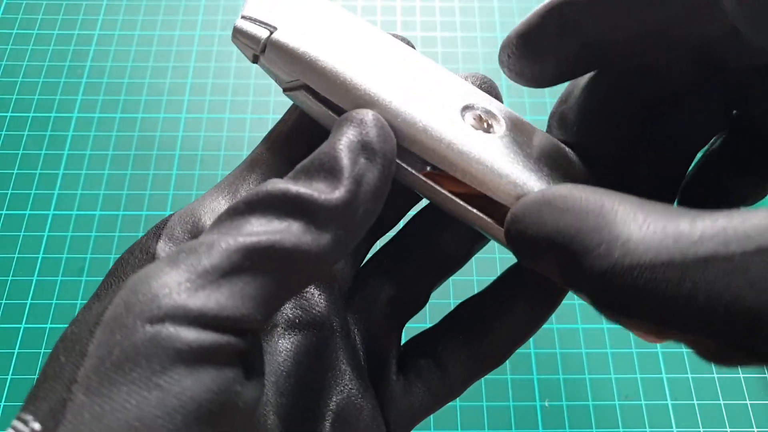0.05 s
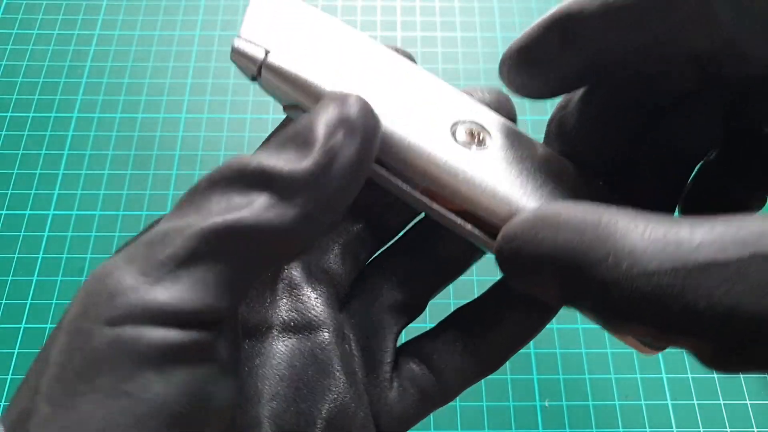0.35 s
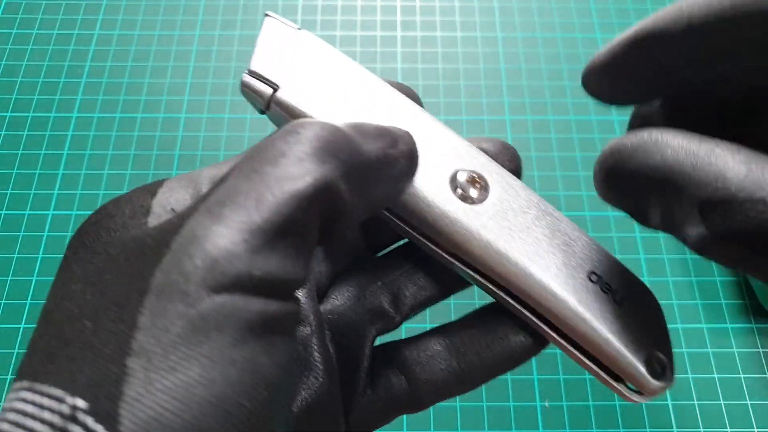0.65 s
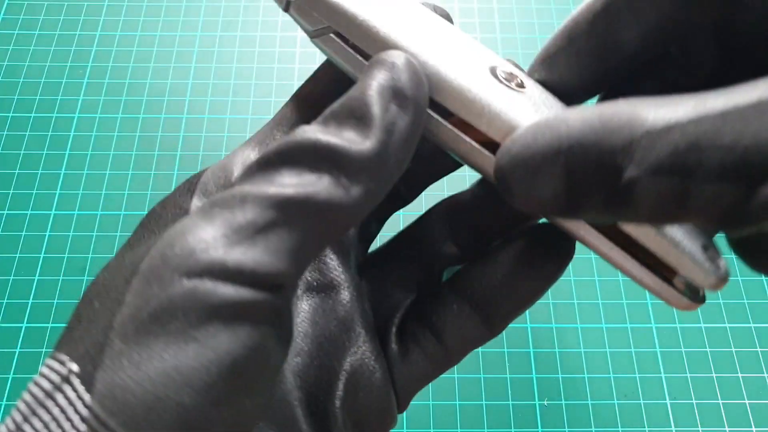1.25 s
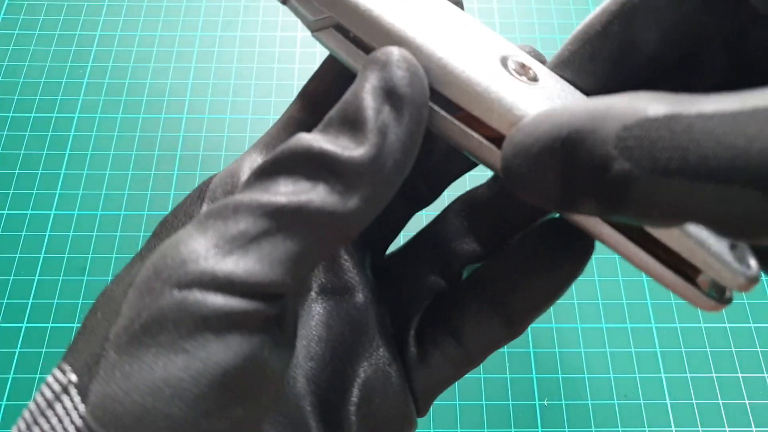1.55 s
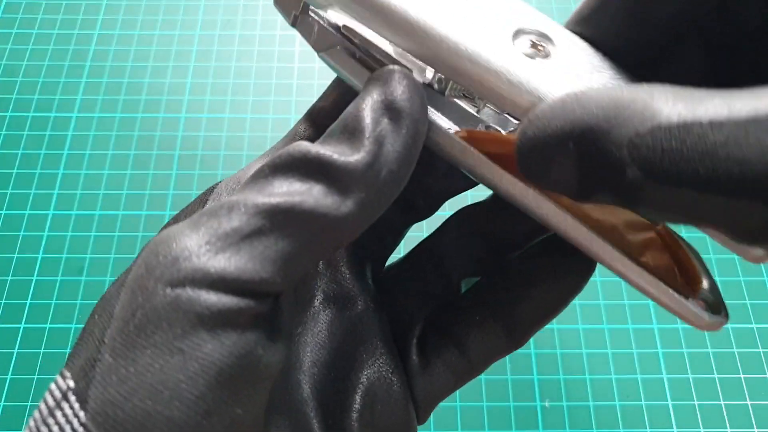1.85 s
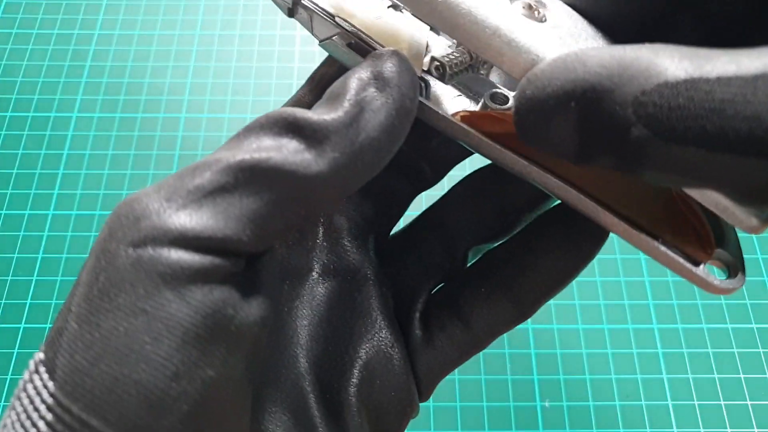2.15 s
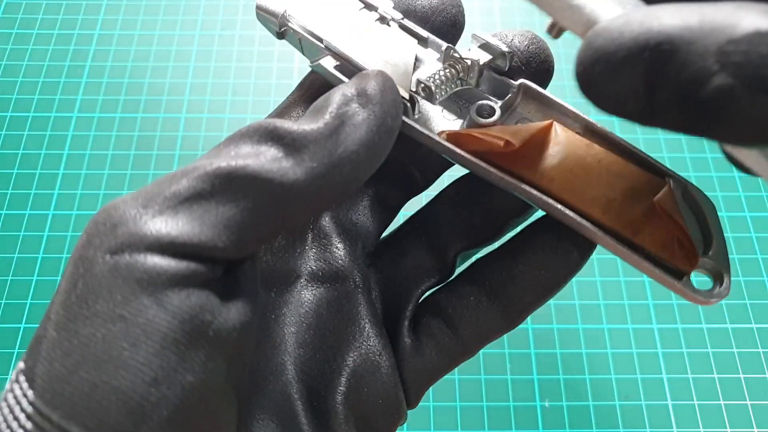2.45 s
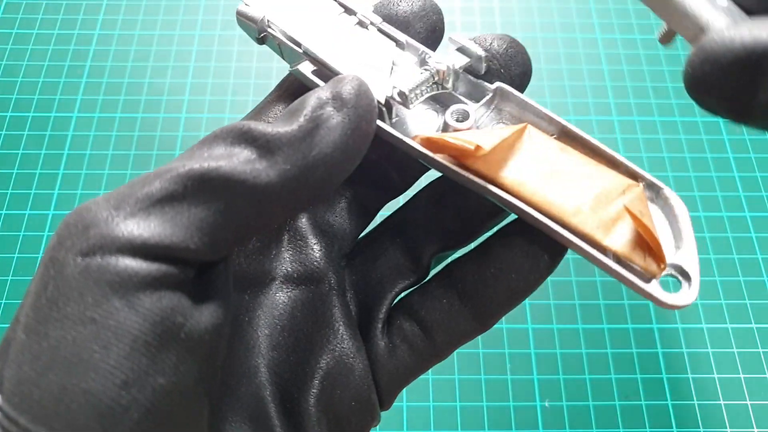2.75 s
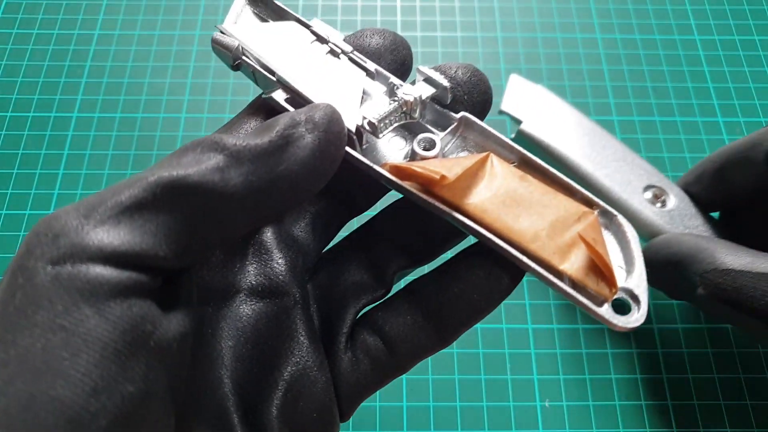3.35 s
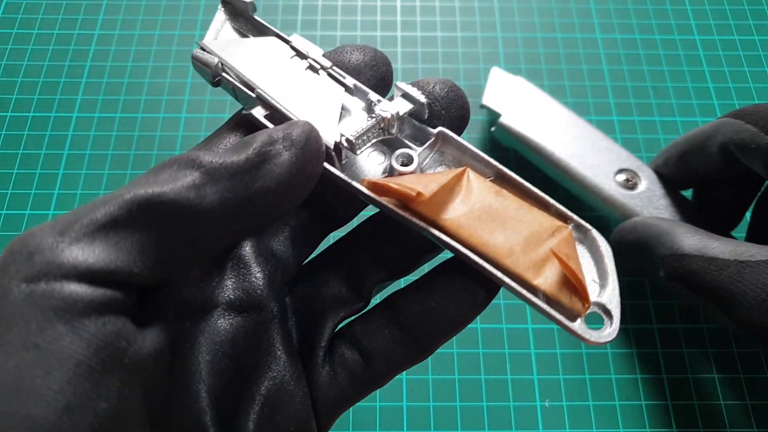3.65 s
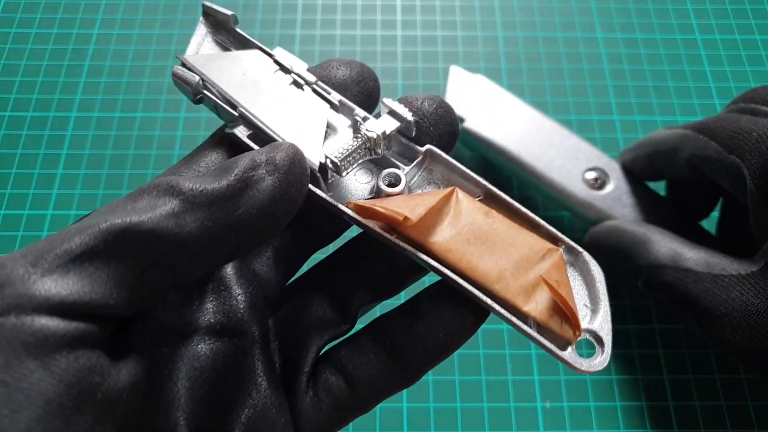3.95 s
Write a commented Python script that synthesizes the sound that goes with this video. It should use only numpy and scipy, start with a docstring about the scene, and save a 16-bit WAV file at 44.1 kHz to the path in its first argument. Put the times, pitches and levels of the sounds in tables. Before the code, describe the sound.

A metal utility knife clicks and snaps sharply twice as gloved hands work it open. The halves rattle and scrape apart, then one lands on a mat with a dull clack, close up in a small room.

```python
"""Opening a utility knife

Gloved hands work the two cast-metal halves of a knife apart, close up in a small room. The halves
snap together twice, rattle and scrape as they part, and one is set down on a cutting mat.
The grip damps the metal, so the room carries the tails. A far engine drone and soft hiss lie below."""
import sys
import numpy as np
from scipy import signal
from scipy.fft import rfft, irfft
from scipy.io import wavfile

SR = 44100
rng = np.random.default_rng(int(sys.argv[2]) if len(sys.argv) > 2 else 0)


def unload_wav(signal):
    """Save mono or channel-first audio to the path in sys.argv[1] as 16-bit WAV at rate SR, clipped to [-1, 1]."""
    wavfile.write(
        sys.argv[1],
        SR,
        np.round(np.clip(np.atleast_2d(signal).T, -1, 1) * 32767).astype(np.int16),
    )


N = 176400
T = np.arange(N) / SR


def from_db(db):
    """Decibels to gain."""
    return 10 ** (np.asarray(db) / 20)


def rms_one(x):
    """Scale to unit rms."""
    return x / np.sqrt(np.mean(x ** 2) + 1e-20)


def pan(db):
    """Stereo gains that put the left side db above the right."""
    return from_db(np.array([[.5], [-.5]]) * db)


def level(rows):
    """A fader ride through rows of seconds and dB."""
    return from_db(np.interp(T, *np.transpose(rows)))


def decay(t, t60):
    """A tail that falls 60 dB in t60 seconds."""
    return np.exp(-np.log(1000) * t / t60)


def at_hz(points, hz):
    """Read a table on a log-frequency axis."""
    freqs, values = np.transpose(points)
    return np.interp(np.log(np.maximum(hz, 1)), np.log(freqs), values)


def add(out, start_s, x):
    """Mix x in at its start time."""
    i = max(int(start_s * SR), 0)
    out[:, i:i + x.shape[1]] += x[:, :N - i]


def brighten(hz, tilt):
    """Harder contacts favour the highs: a tilt in dB per octave about 4 kHz, flat below 1.5 kHz."""
    return from_db(tilt * np.log2(np.maximum(hz, 1500) / 4000))


def noise(spectrum, size, correlation=None, tilt=0):
    """Coloured stereo noise, at unit rms before the tilt."""
    hz = np.fft.rfftfreq(size, 1 / SR)
    mid, side = rfft(rng.standard_normal((2, size)))
    alike = np.clip(at_hz(correlation, hz), 0, .995) if correlation else 0
    stereo = np.sqrt(1 + alike) * mid + np.sqrt(1 - alike) * side * [[1], [-1]]
    colour = rms_one(from_db(at_hz(spectrum, hz)))
    return irfft(stereo * colour * brighten(hz, tilt), size) / np.sqrt(2)


# Stereo image of rumble, rub and hiss. Each row: frequency in Hz, left-right correlation.
BED_CORRELATION = [(60, 0.79), (150, 0.98), (300, 0.89), (1000, 0.21), (3000, 0.13), (12000, .1)]
# Colour of the rumble. Each row: frequency in Hz, relative level in dB.
RUMBLE_COLOUR = [(20, -20.5), (35, -9.5), (60, -3.5), (90, 0), (135, -5), (175, 1.5), (225, -6), (270, -14),
                 (360, -19), (500, -25.5), (750, -35), (1100, -45), (2500, -53.5), (6000, -89)]
# Its fader ride. Each row: time in seconds, level in dB.
RUMBLE_RIDE = [(0, -28), (.55, -26), (1.2, -27.5), (1.6, -29), (2.3, -29.5), (2.7, -27), (4, -27)]


def rumble():
    """A low bed of noise that swells gently."""
    return level(RUMBLE_RIDE) * noise(RUMBLE_COLOUR, N, BED_CORRELATION)


# Colour of the hiss. Each row: frequency in Hz, relative level in dB.
HISS_COLOUR = [(300, -6.5), (1200, -15.5), (1700, -7), (2200, -12), (2700, -2.5), (3200, 1.5), (3850, -3),
               (4400, -14), (6000, -24.5), (9500, -30.5), (13000, -23.5), (16000, -22.5)]
# Its fader ride. Each row: time in seconds, level in dB.
HISS_RIDE = [(0, -49.5), (2.4, -52), (2.9, -49), (3.6, -50.5), (4, -51)]


def hiss():
    """Soft, nearly steady air, leaning left."""
    return pan(7) * level(HISS_RIDE) * noise(HISS_COLOUR, N, BED_CORRELATION)


def mains_hum(hz=119.8, db=-37):
    """One faint, steady tone from the mains."""
    return from_db(db) * np.sqrt(2) * np.sin(2 * np.pi * hz * T)


# The engine's partials. Each row: pitch in Hz, wander in Hz, relative level in dB.
ENGINE_PARTIALS = [(75.8, 2.2, 0.5), (145.6, 3, -7.5), (226.5, 6, -11.5)]
# Their fader ride. Each row: time in seconds, level in dB.
ENGINE_RIDE = [(0, -26), (.28, -31), (.55, -36), (.9, -25.5), (1.3, -27.5), (1.55, -35.5), (1.8, -34.5),
               (2.6, -37), (4, -38)]


def far_engine():
    """A distant drone of low partials, each wandering in pitch."""
    drone = 0
    for hz, wander_hz, db in ENGINE_PARTIALS:
        wander = np.interp(T, np.linspace(0, T[-1], 40), rng.standard_normal(40))
        phase = 2 * np.pi * np.cumsum(hz + wander_hz * wander) / SR
        drone += from_db(db) * np.sqrt(2) * np.sin(phase)
    return level(ENGINE_RIDE) * drone


# Colour of the reverb. Each row: frequency in Hz, band gain in dB.
REVERB_COLOUR = [(150, -9), (600, -5), (1500, -10), (3200, -10), (6000, -11.5), (10000, -14.5),
                 (15000, -9.5)]
# Its tail. Each row: frequency in Hz, 60 dB decay time in seconds.
REVERB_DECAY = [(300, .35), (2000, 0.24), (6000, 0.24), (15000, 0.22)]
# Its stereo image. Each row: frequency in Hz, share of the reflections common to both sides.
REVERB_SHARED = [(400, 0.814), (1000, .55), (2500, 0.041)]


def room(x, predelay_s=.0029):
    """Dense reflections die away band by band, centred in the lows and wide in the highs."""
    t, edges = T[:N // 7], np.geomspace(120, 17000, 13)
    white, response = rng.standard_normal((2, 2, len(t))), 0
    onset = np.clip(t / predelay_s - 1, 0, 1)
    for k, (low, high) in enumerate(zip(edges, edges[1:])):
        hz = np.sqrt(low * high)
        tail = onset * decay(t, at_hz(REVERB_DECAY, hz))
        band = signal.sosfilt(signal.butter(2, [low, high], "band", fs=SR, output="sos"), white[k % 2])
        band += at_hz(REVERB_SHARED, hz) * (band[0] - band)
        response += band * tail / np.sqrt(np.sum(tail ** 2)) * from_db(at_hz(REVERB_COLOUR, hz))
    return pan(2) * signal.fftconvolve(x, response, axes=1)[:, :N]


# Colour of the gloves. Each row: frequency in Hz, relative level in dB.
GLOVE_COLOUR = [(150, -9.5), (290, 6.5), (450, -4), (700, -14.5), (1100, -35), (2000, -27.5), (4000, -35),
                (9000, -46)]
# Their fader ride. Each row: time in seconds, level in dB.
GLOVE_RIDE = [(0, -35.5), (.4, -51), (.75, -47), (1.1, -46), (1.3, -87), (2.05, -45.5), (2.3, -56.5)]


def glove_rub():
    """Gloves rub on the handle with a muffled rustle."""
    return level(GLOVE_RIDE) * noise(GLOVE_COLOUR, N, BED_CORRELATION)


# Contact noise of the loose halves, sliding or knocking. Each row: frequency in Hz, relative level in dB.
SHELL_CRACK = [(200, -29), (900, -19.5), (1400, -8), (1900, 7), (3200, 6), (5000, 0), (6500, -8.5),
               (8500, -5.5), (16000, -13.5)]
# Fader ride of the scrape. Each row: time in seconds, level in dB.
SLIDE_RIDE = [(1.92, -75), (1.93, -43.5), (1.97, -38.5), (2.0, -52.5), (2.06, -56.5), (2.15, -66),
              (2.2, -87)]


def slide(slips_per_s=860, slip_s=.0019, squeak_hz=4740, squeak_width_hz=53):
    """The halves slide apart: tiny slips roughen the scrape and keep one mode of the shell singing."""
    slips = (rng.random(N) < slips_per_s / SR) * rng.uniform(.5, 1, N)
    friction = rms_one(signal.lfilter([1], [1, -np.exp(-1 / (slip_s * SR))], slips + 1e-18))
    scrape = noise(SHELL_CRACK, N, tilt=3.6) * friction
    radius = np.exp(-np.pi * squeak_width_hz / SR)
    feedback = [1, -2 * radius * np.cos(2 * np.pi * squeak_hz / SR), radius ** 2]
    squeak = rms_one(signal.lfilter([1, 0, -1], feedback, scrape))
    return level(SLIDE_RIDE) * (scrape + squeak)


# Stereo timing of the ring. Each row: frequency in Hz, left side's lead in seconds before lead_scale.
MODE_LEAD = [(700, 0.000053), (1900, .0001), (3200, 0.000049), (5000, 0.00015), (9000, 0.000081),
             (14000, 0.000024)]
# Stereo image of the contact noise. Each row: frequency in Hz, left-right correlation.
CRACK_CORRELATION = [(500, 1), (1200, .6), (2500, .05)]
ATTACK_S, MODE_SCATTER_DB = .00052, 2.2
GRIP_DETUNE = .002  # the shifting grip moves each mode by about this share from hit to hit
CHATTER_S = .011  # dense, quickly damped modes prolong every contact by this much


def strike(modes, crack_colour, contact_s, tilt, crack_db=.5, lead_scale=1):
    """One hit: a crack of contact noise and decaying modes, each struck with its own strength."""
    t = T[:N // 12]
    hz, db, t60, pan_db = np.transpose(modes)
    gains = from_db(db + MODE_SCATTER_DB * rng.standard_normal(len(hz))) * brighten(hz, tilt)
    hz = hz * (1 + GRIP_DETUNE * rng.standard_normal(len(hz)))
    crack = noise(crack_colour, len(t), CRACK_CORRELATION, tilt)
    hit = from_db(crack_db) * pan(4.5) * crack * decay(t, contact_s + CHATTER_S)
    for k in range(len(hz)):
        lead_s = lead_scale * at_hz(MODE_LEAD, hz[k])
        age = np.maximum(t - [[0], [lead_s]], 0)
        ring = np.sin(2 * np.pi * hz[k] * age) * decay(age, t60[k])
        hit += (-1) ** k * gains[k] * pan(pan_db[k]) * ring
    return hit * (1 - np.exp(-t / ATTACK_S))


# Ring of the half on the mat.
# Each row: pitch in Hz, relative level in dB, 60 dB decay time in seconds, leftward pan in dB.
MAT_RING = [(392, -8.5, 0.018, -3.5), (623, -1.5, 0.018, 6), (980, -11.5, 0.005, 12),
            (2290, -11, 0.0078, 15), (3180, -6, 0.007, 10), (4340, -15, 0.0065, -14),
            (7840, -36, 0.07, -12), (9180, -37.5, 0.35, -1), (11330, -43, 0.16, 0)]
# Contact noise of the mat. Each row: frequency in Hz, relative level in dB.
MAT_CLACK = [(150, -20), (500, 3.5), (900, 3.5), (1600, -18), (3300, -12), (6000, -20.5), (15000, -48)]


def set_down(start_s=3.7685, db=-10.5):
    """One half meets the cutting mat with a dull clack and a thin ring."""
    out = np.zeros((2, N))
    hit = strike(MAT_RING, MAT_CLACK, contact_s=.0029, tilt=0, crack_db=-.5, lead_scale=-.3)
    add(out, start_s, from_db(db) * hit)
    return out


# Ring of a loose half.
# Each row: pitch in Hz, relative level in dB, 60 dB decay time in seconds, leftward pan in dB.
SHELL_RING = [(1847, -14, 0.012, 9), (2140, -17.5, 0.081, 9), (2902, -4.5, 0.0144, 7.5),
              (3380, -4.5, .018, 4), (4182, -13.5, 0.011, -6), (4740, -4, .022, 6), (5393, -13, 0.019, 9),
              (7660, -8.5, .018, 2.5), (8340, -15, 0.017, 7), (9080, -24, .03, 5), (10010, -22, .018, 6.5),
              (11250, -16, .022, 7.5), (13100, -21.5, 0.02, 5.5)]
# The rattle. Each row: start in seconds, level in dB, brightness in dB per octave, contact in seconds.
KNOCK_CUES = [(.002, -34, 1, 0.06), (0.3595, -38, 0, .004), (.3635, -16.5, -0.5, .003),
              (0.371, -32.5, -11.5, .003), (.435, -34, 1, 0.0027), (0.4485, -30, -8, 0.0028),
              (0.456, -22, -7.5, .003), (0.503, -26, -12, 0.0037), (1.179, -32, 0, .006),
              (1.1813, -36, -8, .004), (1.1927, -15, 1, 0.0036), (1.205, -21, 2, .004),
              (1.2104, -10, -0.5, 0.007), (1.2157, -7.5, 1, .005), (1.224, -28, 5, .005),
              (1.249, -19, 1.5, 0.0054), (1.263, -39, -1, .008), (1.2768, -12, 0, .002),
              (1.2818, -16, -1, 0.0047), (1.303, -36, -16, .003), (1.372, -38.5, -11, 0.0023),
              (1.4296, -26.5, 0.5, 0.0045), (1.615, -43, -6.5, .005), (1.76, -24, -2.5, 0.024),
              (1.769, -21, -4, 0.0056), (1.776, -13, 3.5, 0.024), (1.7893, -12, 3.5, 0.021),
              (1.9288, -26.5, 3.5, 0.016), (1.971, -32.5, 7.5, 0.0078), (1.992, -29, 2.5, 0.0054),
              (2.018, -37, 1, 0.0053), (2.109, -41, -10.5, .004)]


def knocks():
    """The loose halves knock together in little clusters, damped by the grip."""
    out = np.zeros((2, N))
    for start_s, db, tilt, contact_s in KNOCK_CUES:
        add(out, start_s, from_db(db) * strike(SHELL_RING, SHELL_CRACK, contact_s, tilt))
    return out


# Ring of the closed handle.
# Each row: pitch in Hz, relative level in dB, 60 dB decay time in seconds, leftward pan in dB.
HANDLE_RING = [(743, -19.5, 0.0079, -3.5), (1630, -16.5, 0.016, 6.5), (3098, -3.5, 0.02055, 3.5),
               (3650, -7, 0.012, 0), (4530, -5, .016, 0.5), (5560, -7, 0.014, -11), (7430, -4, 0.016, -1),
               (8515, -5, 0.0096, -0.5), (10160, -9, .016, -2), (11300, -11.5, 0.012, 2.5),
               (12850, -10, .014, 4), (14950, -14.5, 0.0079, 2.5)]
# Contact noise of a snap. Each row: frequency in Hz, relative level in dB.
HANDLE_CRACK = [(200, -15.5), (700, -11), (1250, -19.5), (2200, 1), (3300, 10.5), (5000, 2.5), (8000, -1.5),
                (12000, -9), (16000, -8.5)]
# The two snaps. Each row: start in seconds, level in dB, brightness in dB per octave.
SNAP_CUES = [(.458, 2, 1), (1.315, -3.5, 1)]


def snaps(contact_s=.0042):
    """The halves snap hard against each other and ring briefly as one handle."""
    out = np.zeros((2, N))
    for start_s, db, tilt in SNAP_CUES:
        add(out, start_s, from_db(db) * strike(HANDLE_RING, HANDLE_CRACK, contact_s, tilt))
    return out


def scene():
    """The knife and its reverb over a dry background bed."""
    bed = pan(3) * (rumble() + far_engine() + mains_hum() + glove_rub()) + hiss()
    metal = slide() + snaps() + knocks() + set_down()
    return bed + metal + room(metal)


def record(dry, ceiling=.94, cutoff_hz=15750):
    """Soft clipping rounds the hardest snaps, then a steep low-pass trims the top."""
    clipped = ceiling * np.tanh(dry / ceiling)
    return signal.sosfilt(signal.ellip(14, .1, 70, cutoff_hz, fs=SR, output="sos"), clipped)


dry = scene()
out = record(dry)
unload_wav(out)
```